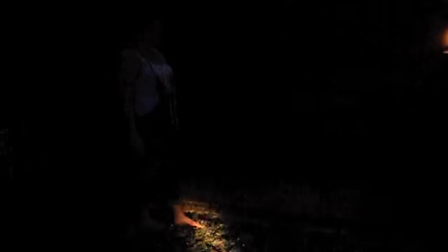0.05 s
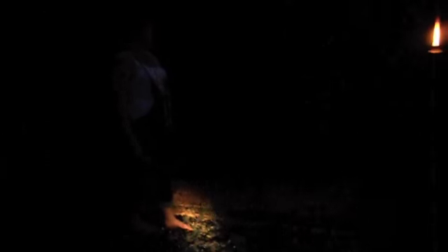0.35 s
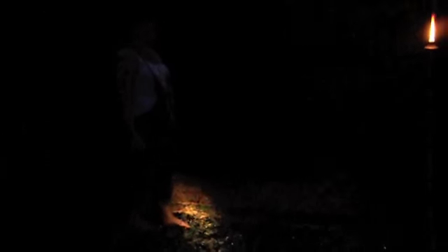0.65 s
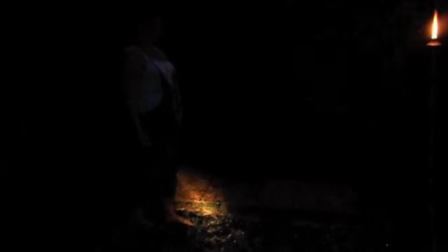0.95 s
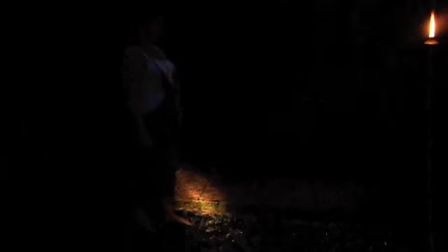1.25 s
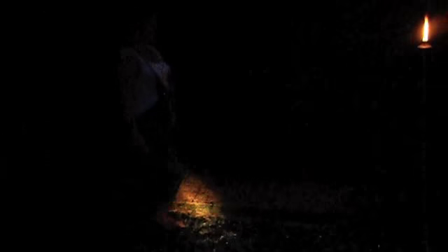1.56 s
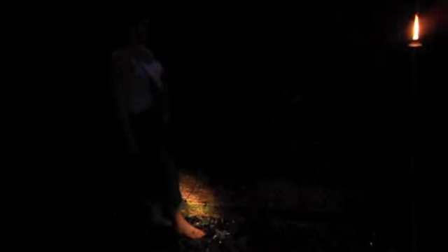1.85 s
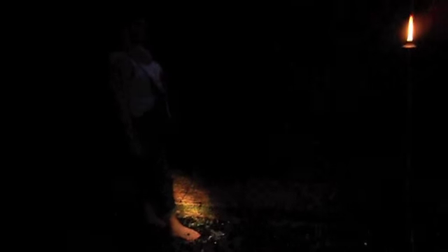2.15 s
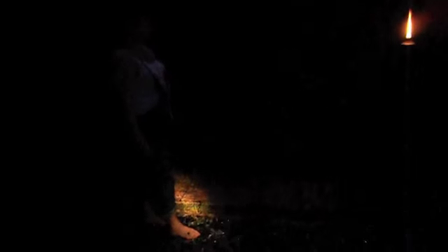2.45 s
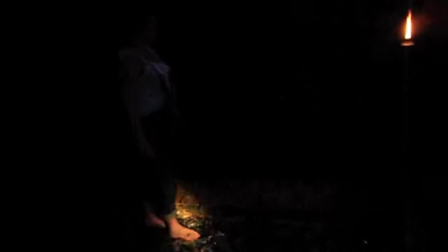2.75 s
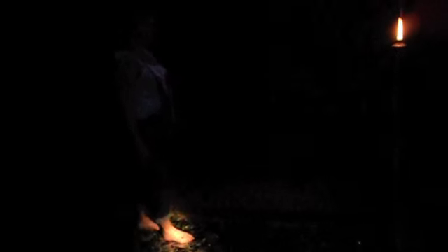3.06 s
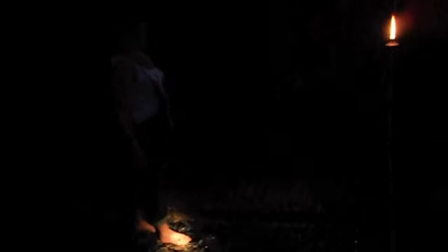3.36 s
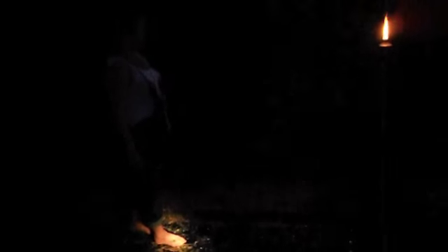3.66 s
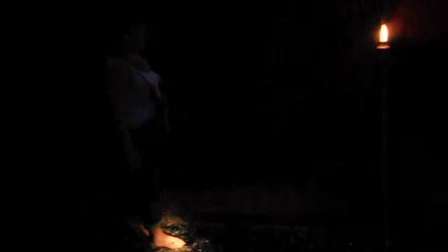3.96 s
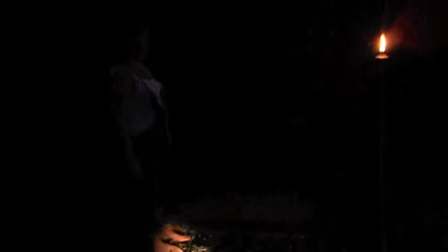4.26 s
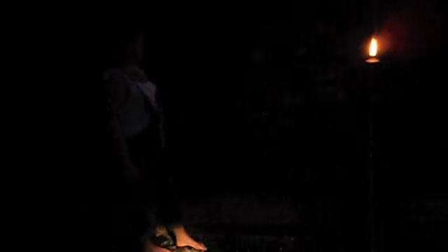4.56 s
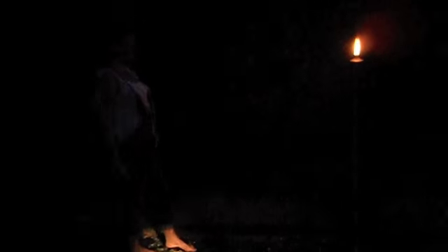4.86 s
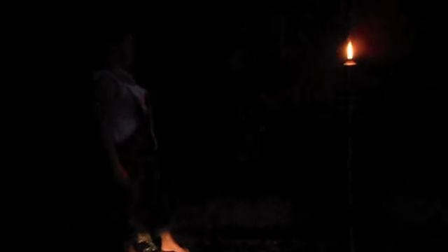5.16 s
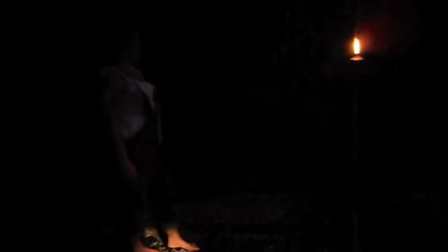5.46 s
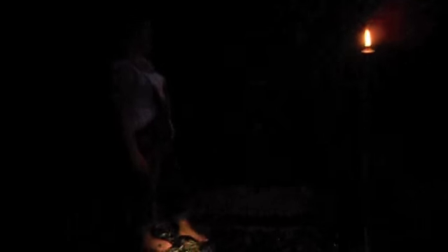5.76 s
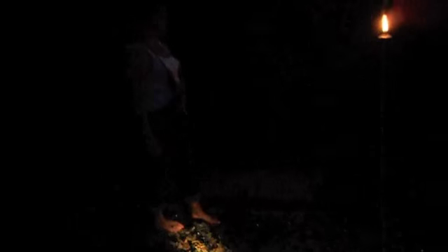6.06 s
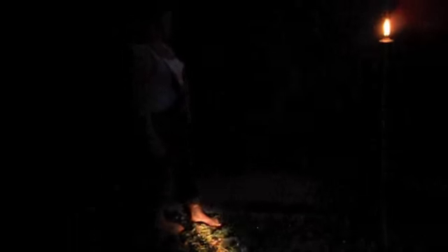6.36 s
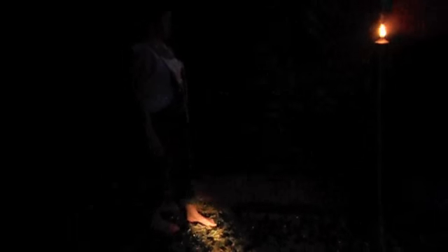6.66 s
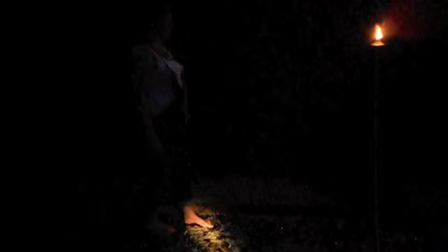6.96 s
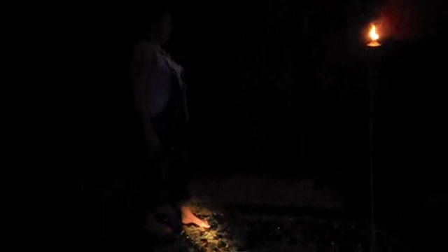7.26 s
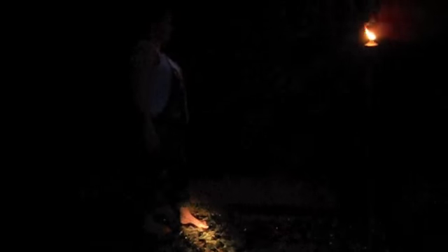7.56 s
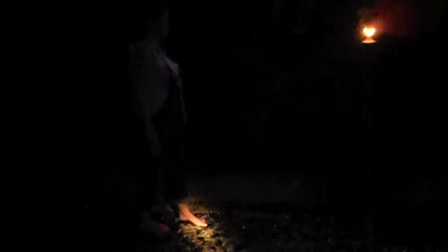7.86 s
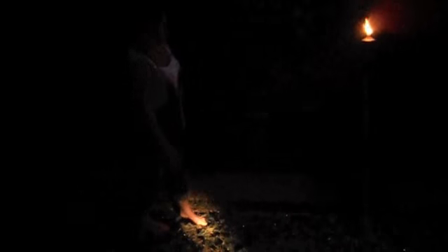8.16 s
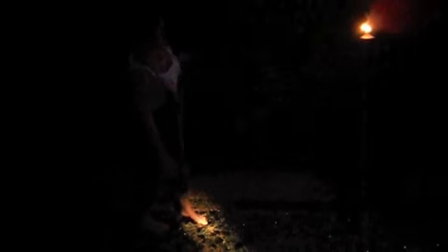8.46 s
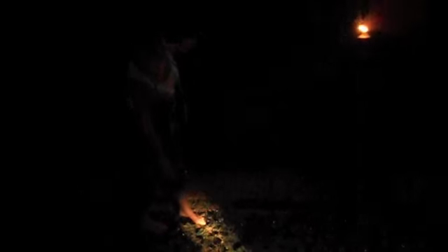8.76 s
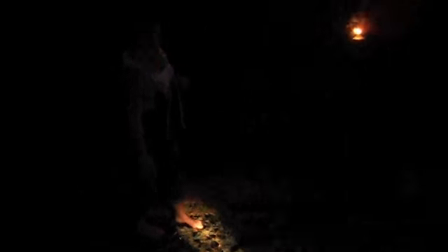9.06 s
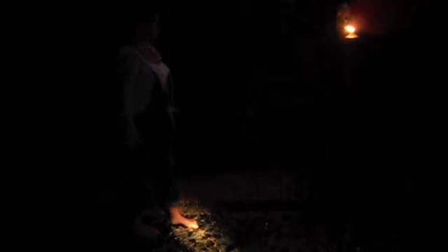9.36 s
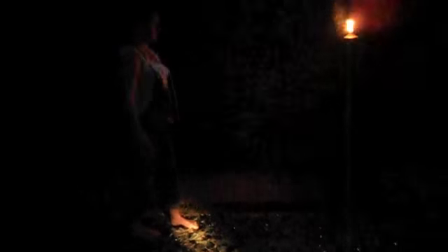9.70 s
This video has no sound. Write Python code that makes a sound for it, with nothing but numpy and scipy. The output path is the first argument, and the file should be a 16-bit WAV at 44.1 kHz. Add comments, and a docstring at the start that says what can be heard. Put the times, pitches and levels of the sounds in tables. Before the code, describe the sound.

Someone walks slowly barefoot over broken glass outdoors at night, close to the microphone. Shards snap in sharp, irregular clicks, splinters grind under the soles and loose pieces clink briefly. The loudest crunch comes early, with a dull knock and bright ringing. More cracks follow in uneven clusters, busier in the second half, over a soft hush of torch flames and far traffic.

```python
"""Bare feet on broken glass

Slow steps cross a bed of glass, close by, outdoors at night. Shards snap by brittle fracture, splinters
grind under the sole, loose pieces clink in their free modes, and heavy breaks knock on the ground.
Behind lies a soft hush of torch flames and far traffic. A gain control ducks it all after loud snaps."""
import sys
import numpy as np
from scipy import signal
from scipy.fft import rfft, irfft
from scipy.io import wavfile
from scipy.ndimage import uniform_filter1d, minimum_filter1d

SR = 44100
rng = np.random.default_rng(int(sys.argv[2]) if len(sys.argv) > 2 else 0)


def dump(signal):
    """Clip the signal to [-1, 1] and save it as 16-bit WAV at the path in sys.argv[1]."""
    limited = np.clip(np.atleast_2d(signal).T, -1, 1)
    pcm = np.round(limited * 32767).astype(np.int16)
    wavfile.write(sys.argv[1], SR, pcm)


N = 429093
TIME = np.arange(N) / SR

# Breaking shards. Each row: start in seconds, nominal fracture length in ms, level over 5 ms in dB,
# body against that level in dB, brightness in dB.
FRACTURES = [(0.2226, 1.5, -29.5, -4, -10), (0.3192, 2.7, -4.5, -4.5, -5), (0.3936, 1.1, -16.0, -8, -1),
             (0.8059, 1.3, -22.5, -9, -4), (0.96, 1.2, -21.5, -23.5, -8), (0.977, 0.8, -28.0, -20.5, -6),
             (1.0432, 1.8, -25, -18, -2), (1.1466, 0.4, -24, -19, 0.5), (1.196, 0.5, -29, -17, -5),
             (1.2257, 1.1, -21.5, -16, -3), (1.239, 0.9, -21.5, -21, -2), (1.3013, 0.81, -11.5, -15, -2.5),
             (1.4494, 2.3, -18.5, -11, 4.5), (1.5658, 5.1, 2.0, -4.5, 4), (1.6752, 3.1, -12, -3, 11),
             (2.0669, 0.8, 0.0, -10, -7), (2.0999, 1.6, -3.5, -14, -6), (2.1115, 0.59, 1, -8, -9),
             (2.5302, 1.3, -25.5, -9, -4.5), (2.8102, 1.1, -26.5, -15, -5), (2.8855, 0.65, -27, -16, 0),
             (2.8927, 0.8, -23.5, -12, -7), (3.0859, 1.38, -24, -6, 0), (3.1549, 4.3, -7.5, -10, -3.5),
             (3.2363, 0.42, -15.5, -14, -6.5), (3.2883, 0.43, -5, -13.5, -0.5),
             (3.4596, 0.9, -18, -6.5, -6), (3.4908, 0.84, -18.5, -14, -3), (3.844, 0.8, -27.5, -2.5, -3),
             (4.0279, 1.63, 0.5, -7.5, -1.5), (4.2325, 0.98, -7.5, -12.5, -0.5), (4.3751, 1, -18.5, -8, -2),
             (4.7533, 2.26, -12.5, 2, 8), (4.8633, 1.8, -22.0, -7, -1), (4.9829, 3.2, -16.5, -0.5, -11),
             (5.0309, 0.66, -11, -9, 0.5), (5.245, 0.99, -23.5, -13, 4), (5.299, 0.57, -20, -5, 10),
             (5.3118, 0.67, -21, -3, 7), (5.329, 5.4, -19.5, -3, 5), (5.3506, 2, -15.5, -8, 11),
             (5.4886, 2.1, -29.0, 4, -1), (5.6153, 4.1, -20, -1, -7), (5.6562, 1.42, -23.5, -9.5, 1),
             (5.6742, 1.92, -20.5, -12, -1), (5.8056, 2.06, -14.5, -9, 4), (5.8764, 5.6, -21.0, -2.5, 4),
             (6.2196, 0.46, -22, -5, -4), (6.3513, 2.5, -26.5, -17, -3), (6.565, 3.7, -26.5, 1.5, -1),
             (6.6527, 0.23, -11.5, -14, -4.5), (6.6962, 1.3, -22.5, -10, 3), (6.9003, 2.7, -11.5, -6, 1),
             (6.9463, 1.2, -12, -9.5, -5), (6.974, 1.3, -12, -21, 2.5), (6.987, 1.53, -16, -5.5, -6),
             (7.2026, 3.3, -8.0, -6, -3.5), (7.319, 0.74, -14.5, -9, 1), (7.3431, 0.34, -21.5, -21, 5),
             (7.43, 1.5, -7.0, 3, -3.5), (7.448, 1.2, -16, -14, 2), (7.677, 0.46, -18.5, -10, -3.5),
             (7.7473, 3.3, -16, -6, 4.5), (7.8264, 1.12, -22.5, -14, -0.5), (7.843, 1.65, -20, -6, -2),
             (7.861, 0.4, -16, -21, 8), (7.976, 1.2, -23.5, -13, 4), (8.0356, 1.2, -15, -11, 6.5),
             (8.049, 0.63, -22, -20, 6), (8.135, 1.1, -25.5, -9.5, 4), (8.3056, 4.65, -3.5, -6, -2.5),
             (8.3833, 1.53, -18, -18.5, -2), (8.479, 1.66, -13.5, -18, 0), (8.6591, 2.03, -10, -5.5, 1.5),
             (8.68, 1.58, -15, -9, -2), (8.7848, 3.5, -11.5, -0.5, 1), (9.164, 0.78, -12.5, -3, 7),
             (9.203, 1.37, -7, -27, -1.5), (9.325, 0.54, -12.5, -23, -0.5), (9.364, 0.91, -18.5, -3, 3),
             (9.4032, 2.8, -18, -10, -3), (9.4394, 4.85, -9.5, -9, 3), (9.4801, 0.91, -24, 2, 2),
             (9.5408, 0.65, -8, -9, 7)]
# Spectrum of crushed glass. Each row: frequency in Hz, relative level in dB.
SPLINTER_SPECTRUM = [(400, -10), (800, -24), (1500, -9), (2300, 2), (4500, 2), (6000, 0.5), (9500, -1.5),
                     (11000, -53.5)]


def from_db(db):
    """Amplitude grows tenfold every 20 dB."""
    return 10 ** (np.asarray(db) / 20)


def rms_one(x):
    """Normalisation to unit rms."""
    return x / np.sqrt(np.mean(x ** 2) + 1e-20)


def in_time(rows):
    """Linear interpolation of (seconds, value) rows at every sample."""
    return np.interp(TIME, *np.transpose(rows))


def decay(t, t60):
    """Exponential damping: 60 dB in t60 seconds."""
    return np.exp(-np.log(1000) * t / t60)


def band(x, low_hz, high_hz, order=2):
    """Causal band-pass filtering."""
    sos = signal.butter(order, [low_hz, high_hz], "band", fs=SR, output="sos")
    return signal.sosfilt(sos, x + 1e-18)


def coloured_noise(spectrum):
    """Spectral shaping of white noise by (Hz, dB) rows, at unit rms."""
    hz, db = np.transpose(spectrum)
    bins = np.maximum(np.fft.rfftfreq(N, 1 / SR), 1)
    gain = from_db(np.interp(np.log(bins), np.log(hz), db))
    return rms_one(irfft(rfft(rng.standard_normal(N)) * gain, N))


def drift(per_s):
    """Random modulation of unit rms, with per_s new values a second."""
    knots = rng.standard_normal(4096)
    return rms_one(np.interp(TIME * per_s, np.arange(len(knots)), knots))


def add(out, s, sound):
    """Superposition of a short sound, starting at s seconds."""
    start = max(round(s * SR), 0)
    part = out[start:start + len(sound)]
    part += sound[:len(part)]


def snaps(warning_db=-19, settle_db=-16):
    """Brittle fracture releases strain in a broadband burst that each shard colours differently."""
    # Bands of a snap, from body to edge. Each row: lower and upper limit in Hz.
    snap_bands = [(720, 1450), (2100, 3300), (3300, 6300), (6500, 10500)]
    starts, length_ms, level_db, body_db, bright_db = np.transpose(FRACTURES)[:, :, None]
    out, t = np.zeros(N), TIME[:1024]
    decay_s = .78 * np.maximum(length_ms / 1000, .0004)
    # a clean break starts at once, a crumbling one builds up
    envelope = (1 - np.exp(-t / (.51 * decay_s))) * np.exp(-t / decay_s)
    # brightness tips the three upper bands about the middle one
    upper = from_db([-bright_db, np.full_like(bright_db, 6), bright_db])
    shares = [from_db(body_db), *(upper / np.linalg.norm(upper, axis=0))]
    bursts = rng.standard_normal((len(starts), 2, len(t)))
    cracks = 0
    for k, (low, high) in enumerate(snap_bands):
        part = band(bursts[:, k % 2] * envelope, low, high, order=2 if k == 0 else 3)
        rms_5ms = np.sqrt(np.sum(part ** 2, axis=1, keepdims=True) / (.005 * SR))
        cracks = cracks + part / rms_5ms * shares[k] * from_db(level_db)
    # the shard ticks just before it gives way, and its halves settle just after
    gaps_s = rng.uniform(.0022, .011, (len(starts), 2))
    for s, crack, (before, after) in zip(starts[:, 0], cracks, gaps_s):
        add(out, s - before, from_db(warning_db) * crack / max(1, np.abs(crack).max()))
        add(out, s, crack)
        add(out, s + after, from_db(settle_db) * crack)
    return out


def pinned_shards(t60=.013, rise_s=.00032, gain_db=7):
    """Contact damping: skin stops the ring of a big snapping shard almost at once."""
    # Modes under the sole. Each row: start in seconds, frequency in Hz, relative level in dB.
    pinned_modes = [(0.3195, 2040, -4), (0.32, 1220, -3.5), (1.3015, 2700, -11.5), (2.0684, 2530, -6),
                    (2.112, 3850, 1), (3.1549, 2931, -6), (4.0283, 4857, 1.5), (4.0282, 4072, 6),
                    (6.653, 4370, -4.5), (6.9486, 4150, -11), (7.2033, 2515, -5.5), (7.4295, 1235, 0.5),
                    (7.43, 3723, -3.5), (8.307, 3540, -1), (8.308, 4521, 0.5), (9.2045, 1347, -5.5),
                    (9.327, 6425, -8.5), (9.4413, 6500, -2.5)]
    out, t = np.zeros(N), TIME[:2048]
    envelope = (1 - np.exp(-t / rise_s)) * decay(t, t60)
    for s, hz, db in pinned_modes:
        add(out, s, from_db(db + gain_db) * np.sin(2 * np.pi * hz * t) * envelope)
    return out


def weight_on_glass(sway_db=1.6, crumbs_db=-27, crumbs_t60=.3, attack_s=.006, release_s=.022):
    """Incoherent powers add: stance, crumbs and presses set the grinding's level and brightness in dB."""
    # Grinding under the standing foot. Each row: time in seconds, level in dB.
    stance = [(0, -42), (0.7, -43), (1.1, -43), (1.55, -42), (1.78, -34), (1.92, -44), (2.3, -47),
              (3.0, -42), (3.8, -44.5), (4.3, -41.5), (4.8, -36), (5.2, -39.5), (6.1, -44), (7.1, -39.5),
              (7.6, -37), (9.1, -38), (9.73, -47)]
    # The foot bears down. Each row: start and length in seconds, relative level and brightness in dB.
    presses = [(0.32, 0.014, -17, -5), (0.46, 0.022, -32, -9), (0.67, 0.027, -30, -6),
               (1.26, 0.2, -36, -0.5), (1.57, 0.042, -15, 6), (1.659, 0.056, -19, 11),
               (1.97, 0.078, -28, 2), (2.06, 0.083, -18, -12), (2.593, 0.17, -41, -1.5),
               (2.871, 0.046, -33, -6), (3.1, 0.25, -32, -5.5), (3.39, 0.17, -34, 4),
               (4.03, 0.012, -13, -5), (4.375, 0.054, -14, 9), (4.515, 0.038, -19, 1.5),
               (4.63, 0.073, -27, -2.5), (4.747, 0.034, -22, -10), (4.86, 0.23, -31, -4),
               (5.28, 0.061, -23, -3.5), (5.43, 0.057, -33, -4), (5.59, 0.1, -26.5, -2),
               (5.785, 0.11, -27.5, -4), (6.19, 0.19, -38.5, -6.5), (6.59, 0.066, -31, -9),
               (6.73, 0.06, -30, -4.5), (6.9, 0.098, -26, -3), (7.06, 0.085, -33, -5.5),
               (7.17, 0.076, -23, -3), (7.43, 0.025, -23, -6), (7.69, 0.079, -30, -5), (7.8, 0.12, -29, -6),
               (8.039, 0.079, -39, 4), (8.22, 0.085, -33.5, 2), (8.29, 0.047, -15.5, -1.5),
               (8.64, 0.18, -27, -6), (9.05, 0.16, -28, -4), (9.31, 0.096, -25, -5.5),
               (9.43, 0.062, -19, -2)]
    t = TIME[:SR // 2]
    power = from_db(in_time(stance) + sway_db * drift(13)) ** 2
    for s, _, db, _, _ in FRACTURES:   # grit trickles on after each snap
        add(power, s, from_db(db + crumbs_db - 60 * t / crumbs_t60) ** 2)
    weighted_brightness = -3 * power   # the grinding's steady tone under the standing foot
    for s, length, db, bright_db in presses:
        envelope = (1 - np.exp(-t / attack_s)) * np.exp(-np.maximum(t - length, 0) / release_s)
        press = (from_db(db - 1) * envelope) ** 2
        add(power, s, press)
        add(weighted_brightness, s, press * bright_db)
    return 10 * np.log10(power), weighted_brightness / power


def splinters(level_db, bright_db, mean_t60=.003):
    """Tiny fractures form a Poisson process that quickens with load; each rings in six damped modes."""
    per_s = 260 * from_db(.8 * (level_db + 40))
    onsets = np.flatnonzero(rng.random(N) < np.minimum(per_s / SR, .1))
    size = from_db(5 * np.minimum(rng.exponential(1, (len(onsets), 1)), 5))
    pitch, ring, share = rng.random((len(onsets), 3, 6)).transpose(1, 0, 2)
    hz = 400 + 10400 * (pitch + np.arange(6)) / 6
    t60 = mean_t60 * (.5 + ring)
    colour_db = np.interp(hz, *np.transpose(SPLINTER_SPECTRUM))
    tilt_db = .95 * bright_db[onsets, None] * np.clip(np.log2(hz / 4500), -1, 1)
    phasors = size * from_db(colour_db + tilt_db) * (2 * share - 1) + 0j
    turn = np.exp((2j * np.pi * hz - np.log(1000) / t60) / SR)   # rotation and decay per sample
    out = np.zeros(N + 256)
    for lag in range(256):
        out[onsets + lag] += phasors.imag.sum(axis=1)
        phasors = phasors * turn
    return out[:N]


def grinding(neutral_db=-4, smoothing_s=.0556, split_hz=6000):
    """Crushing and friction: under the sole, splinters tick and grit rubs."""
    level_db, bright_db = weight_on_glass()
    bright_db = bright_db - neutral_db
    ticks = splinters(level_db, bright_db)
    # the weight on the foot sets the power, however the grains happen to fall
    power = np.abs(uniform_filter1d(ticks ** 2, int(smoothing_s * SR)))
    ticks = ticks / np.sqrt(power + .003 * np.mean(power))
    grit = coloured_noise(SPLINTER_SPECTRUM)
    fine = signal.sosfiltfilt(signal.butter(2, split_hz, "high", fs=SR, output="sos"), grit)
    rub = fine * from_db(.5 * bright_db) + (grit - fine) * from_db(-.25 * bright_db)
    roughness = from_db(-6 + 3.5 * drift(120))
    return from_db(level_db) * (from_db(-1) * ticks + rub * roughness)


def clinks(split_hz=45, twin_db=-6, gain_db=-2, rise_s=.0004, rocking_db=3):
    """Two close modes of a free shard beat; the ring wavers as the shard rocks on the heap."""
    # Ringing shards: mostly loose ones, plus near 5.3 s a few brief, high rings of shards held fast. Each row:
    # start in seconds, frequency in Hz, relative level in dB, T60 in seconds.
    ringing_shards = [(0.346, 7780, -33, .12), (0.47, 9030, -32, 0.18), (1.337, 8240, -34, 0.2),
                      (1.369, 8600, -24, 0.081), (1.574, 7637, -1, 0.11), (1.576, 6580, -11, 0.14),
                      (1.621, 6600, -13, 0.089), (1.633, 8070, -17.5, 0.15), (1.666, 7034, -6, 0.079),
                      (1.678, 7900, -2, 0.055), (1.69, 8500, -17, 0.13), (1.717, 7637, -12, 0.18),
                      (1.775, 8400, -13, 0.027), (1.79, 7200, -26.5, 0.12), (1.8435, 8410, -4, 0.13),
                      (1.845, 7600, -17, 0.072), (3.42, 9050, -29, 0.077), (4.07, 7700, -24, 0.08),
                      (4.126, 7780, -15.5, 0.11), (4.165, 7800, -23, 0.15), (4.422, 5520, -23, 0.43),
                      (4.42, 7120, -18, 0.16), (4.53, 8000, -20, 0.14), (5.244, 9380, -13, 0.014),
                      (5.311, 9500, -8, 0.013), (5.328, 9140, -8, 0.021), (5.329, 7550, -23.5, 0.14),
                      (5.36, 6100, -26, 0.091), (6.629, 8670, -29, 0.15), (7.235, 8610, -27, 0.082),
                      (8.245, 7070, -15, 0.071)]
    out, t = np.zeros(N), TIME[:SR // 2]
    beats_hz = split_hz * rng.uniform(.5, 1.1, len(ringing_shards))
    for (s, hz, db, t60), beat_hz in zip(ringing_shards, beats_hz):
        pair = np.sin(2 * np.pi * hz * t) + from_db(twin_db) * np.sin(2 * np.pi * (hz + beat_hz) * t)
        envelope = (1 - np.exp(-t / rise_s)) * decay(t, t60)
        add(out, s, from_db(db + gain_db) * pair * envelope)
    return out * from_db(rocking_db * drift(180))


def knocks(rise_s=.0024):
    """The impact of a heavy break excites low, strongly damped modes of the ground."""
    # Big pieces giving way. Each row: start in seconds, relative level in dB.
    impacts = [(0.3186, -15), (1.5675, 20), (2.068, -2), (2.112, -4.5), (4.754, -9.5), (7.4302, -4.5),
               (8.305, -8)]
    # Ground resonances. Each row: frequency in Hz, relative level in dB, T60 in seconds.
    ground_modes = [(245, 0, .024), (340, -6, .02), (730, 0, .02), (1100, -3, .014)]
    out, t = np.zeros(N), TIME[:4096]
    thud = sum(from_db(db) * np.sin(2 * np.pi * hz * t) * decay(t, t60) for hz, db, t60 in ground_modes)
    for s, db in impacts:
        add(out, s, from_db(db) * thud * (1 - np.exp(-t / rise_s)))
    return band(out, 150, 5800)


def reflections(x, near_db=-14, near_t60=.011, far_db=-26, far_t60=.35):
    """Quick scattering off the glass bed and legs precedes faint, duller reverberation from around."""
    t = TIME[:SR // 2]
    near, far = rng.standard_normal((2, len(t))) * (1 - np.exp(-(t / .00022) ** 2))
    near = band(near, 130, 11000, order=1) * decay(t, near_t60)
    far = band(far, 200, 7000, order=1) * decay(t, far_t60)
    response = from_db(near_db) * near / np.linalg.norm(near) + from_db(far_db) * far / np.linalg.norm(far)
    return signal.fftconvolve(x, response)[:N]


def flames_and_traffic(roar_db=-34.5, flutter_db=.77, hum_hz=209):
    """Broadband noise makes a roar and a hiss, narrowband noise an engine drone; a faint hum enters late."""
    # The low roar and the soft hiss. Each row: frequency in Hz, relative level in dB.
    roar_spectrum = [(20, -7.5), (32, -3), (45, 1), (75, 3.5), (95, -6.5), (150, -2), (230, -8),
                     (450, -5.5), (750, -6), (1300, -25), (3000, -33)]
    hiss_spectrum = [(300, -18.5), (650, -10.5), (820, -1.5), (1080, 1), (1320, -3), (1700, -9.5),
                     (2400, -19), (4500, -24.5), (10000, -50.5)]
    # Swell of the hiss. Each row: time in seconds, level in dB.
    hiss_levels = [(0, -31), (2.4, -36), (3.7, -35.5), (4.4, -31), (5.3, -32), (5.9, -27.5), (6.9, -29.5),
                   (7.7, -28), (8.4, -28.5), (9.3, -24.5), (9.73, -27.5)]
    # A far engine. Each row: centre and bandwidth in Hz, level against the roar in dB.
    engine_bands = [(114.8, 10.2, -5), (72.2, 12, -14.5)]
    drone = sum(from_db(db) * rms_one(band(rng.standard_normal(N), hz - width / 2, hz + width / 2))
                for hz, width, db in engine_bands)
    roar = (coloured_noise(roar_spectrum) + drone) * from_db(roar_db + flutter_db * drift(14))
    hiss = coloured_noise(hiss_spectrum) * from_db(in_time(hiss_levels))
    hum_db = np.interp(TIME, [7.2, 7.8, 9.73], [-68, -44, -43])
    hum = from_db(hum_db) * np.sin(2 * np.pi * np.cumsum(hum_hz + drift(8.6)) / SR)
    return roar + hiss + hum


def gain_control(x, threshold_db=-18, attack_s=.00053, hold_s=.53, release_s=.69, start_cut_db=7.5):
    """Dynamic compression: loud treble pulls the gain down at once; it holds, then creeps back."""
    treble = signal.sosfilt(signal.butter(1, 1500, "high", fs=SR, output="sos"), x)
    window, hold = int(.005 * SR), int(hold_s * SR)
    power = uniform_filter1d(treble ** 2, window, origin=(window - 1) // 2)
    over_db = np.maximum(10 * np.log10(np.abs(power) + 1e-12) - threshold_db, 0)
    held_db = -minimum_filter1d(-over_db, hold, origin=(hold - 1) // 2, mode="constant")
    release = np.exp(-TIME / release_s)
    cut_db = release * np.maximum.accumulate(np.maximum(held_db / release, start_cut_db))
    pole = np.exp(-1 / (attack_s * SR))
    return x * from_db(-signal.lfilter([1 - pole], [1, -pole], cut_db))


def scene():
    """Superposition of the glass underfoot, the echo of its snaps and the night behind, in mono."""
    breaks = snaps()
    glass = breaks + reflections(breaks) + pinned_shards() + grinding() + clinks()
    return (glass + knocks() + flames_and_traffic())[None]


def record(dry, ceiling=.72, cutoff_hz=10250):
    """Compression ducks the mix, soft saturation rounds its peaks and a low-pass cuts the top."""
    ducked = gain_control(dry[0])[None]
    rounded = ducked / (1 + (ducked / ceiling) ** 4) ** .25
    low_pass = signal.cheby1(10, .3, cutoff_hz, fs=SR, output="sos")
    return signal.sosfilt(low_pass, rounded)


dry = scene()
out = record(dry)
dump(out)
```